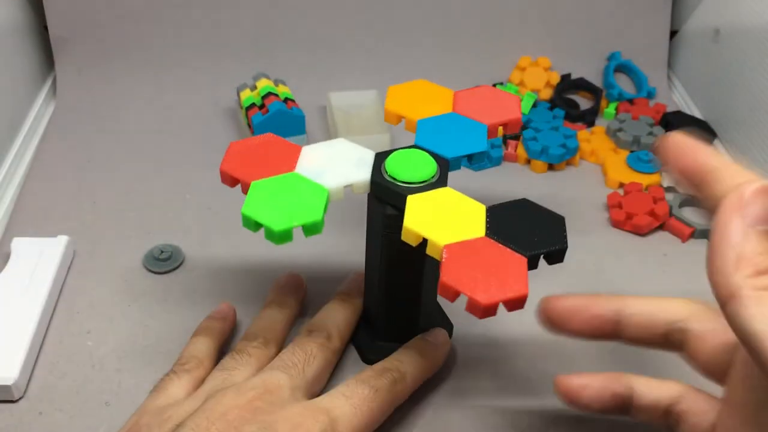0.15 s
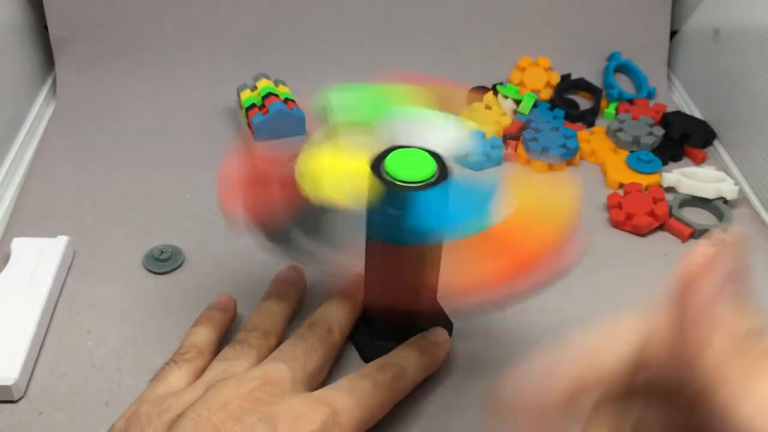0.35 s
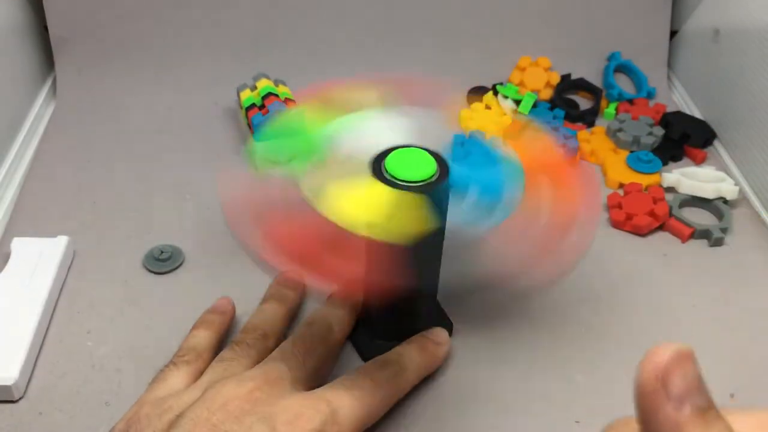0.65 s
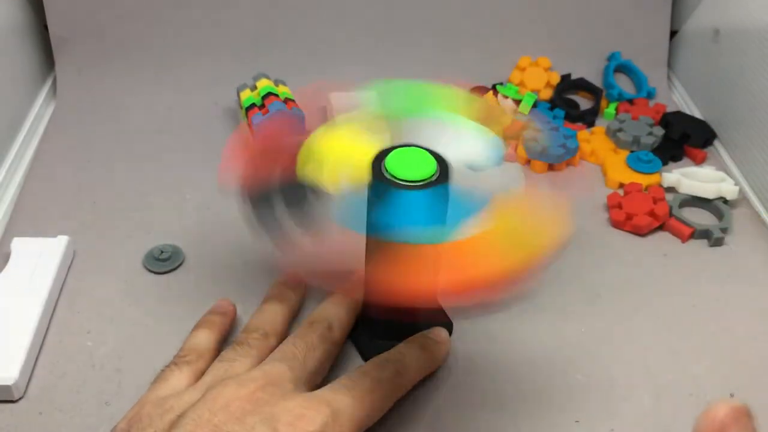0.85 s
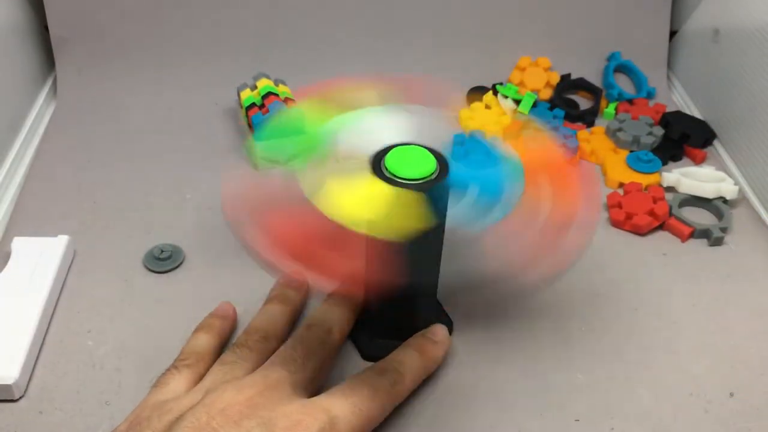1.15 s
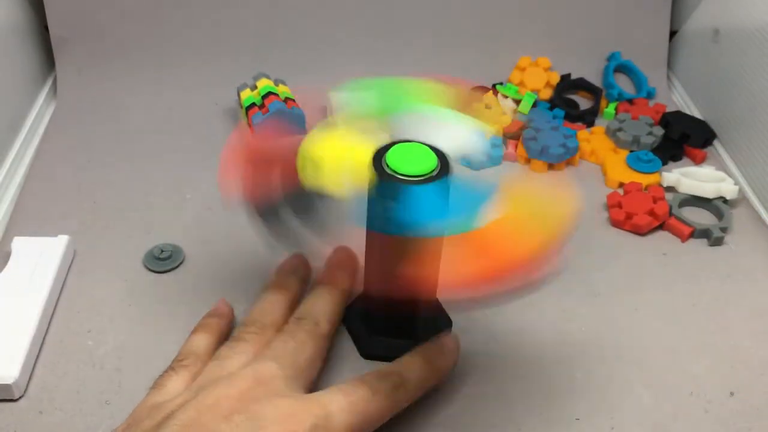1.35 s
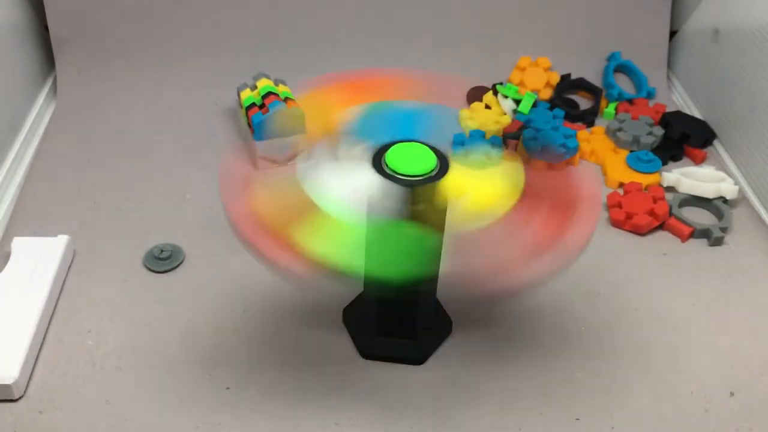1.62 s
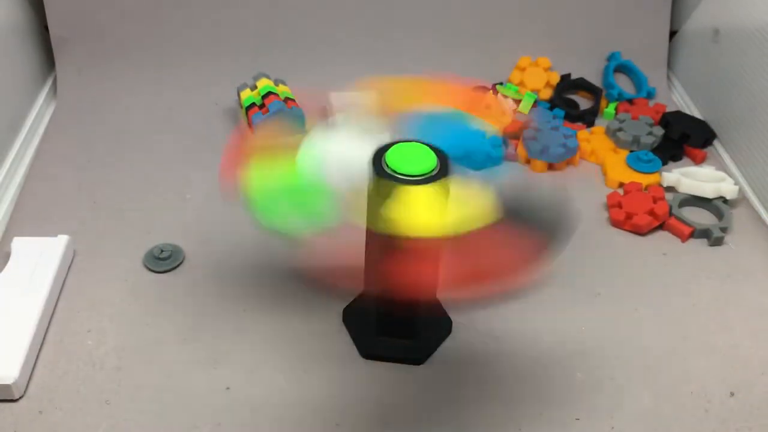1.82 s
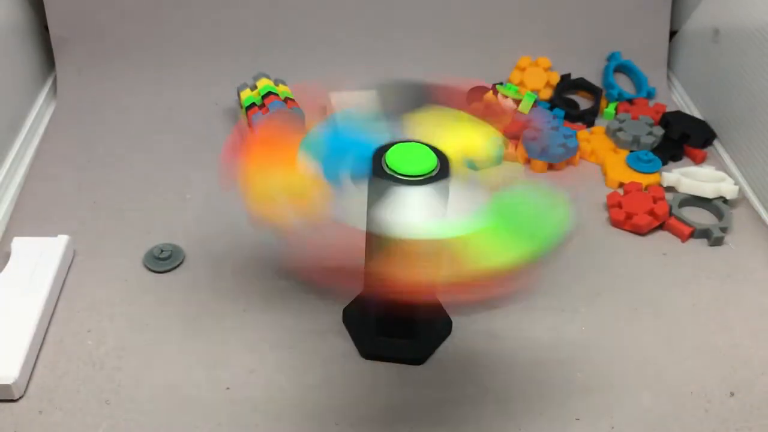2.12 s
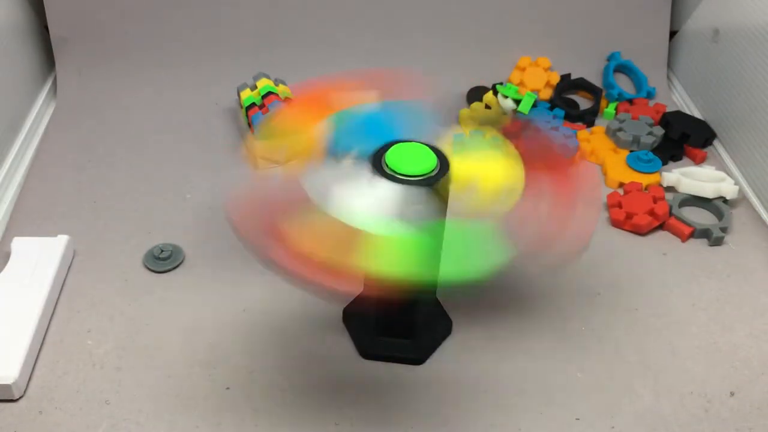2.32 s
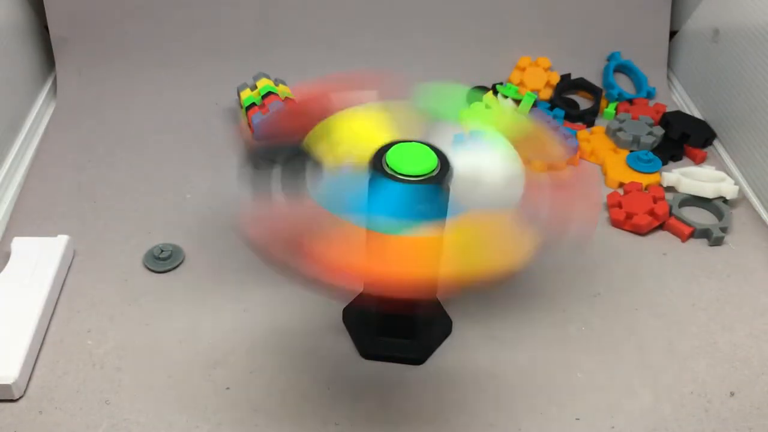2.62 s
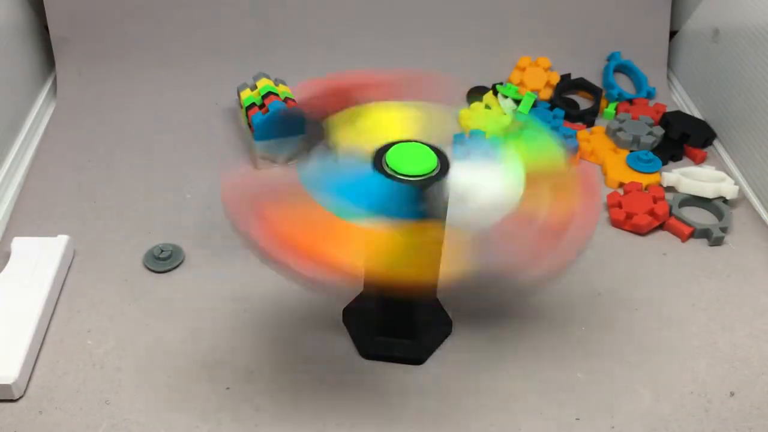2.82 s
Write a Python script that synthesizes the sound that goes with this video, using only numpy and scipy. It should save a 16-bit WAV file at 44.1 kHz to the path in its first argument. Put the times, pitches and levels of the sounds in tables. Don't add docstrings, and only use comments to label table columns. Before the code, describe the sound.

Whirring ball bearing of a flicked toy spinner, dull while hand-held, then brighter and freer

```python
import sys
import numpy as np
from scipy import signal
from scipy.fft import rfft, irfft
from scipy.io import wavfile
from scipy.ndimage import uniform_filter1d

SR = 44100
rng = np.random.default_rng(int(sys.argv[2]) if len(sys.argv) > 2 else 0)


def to_wav(sig):
    pcm = np.clip(np.atleast_2d(sig), -1, 1) * 32767
    pcm = np.round(pcm).astype(np.int16)
    wavfile.write(sys.argv[1], SR, pcm.T)


def rack_gain(trim_db):
    fader = np.asarray(trim_db, float)
    return 10 ** (fader / 20)


N = 130536
T = np.arange(N) / SR


def unit_rms(x):
    return x / np.sqrt(np.mean(x ** 2))


def curve(rows, column=1):
    rows = np.array(rows)
    return np.interp(T, rows[:, 0], rows[:, column])


def bell(centre_s, width_s):
    return np.exp(-0.5 * ((T - centre_s) / width_s) ** 2)


def resonance(x, hz, width_hz):
    b, a = signal.iirpeak(hz, hz / width_hz, fs=SR)
    return signal.lfilter(b, a, x)


def coloured_noise(points):
    points = np.array(points)
    hz = np.maximum(np.arange(N // 2 + 1) * SR / N, 1)
    gain = rack_gain(np.interp(np.log(hz), np.log(points[:, 0]), points[:, 1]))
    return unit_rms(irfft(rfft(rng.standard_normal(N)) * gain, N))


def walk(rate_hz):
    k = int(SR / rate_hz)
    steps = np.repeat(rng.standard_normal(N // k + 1), k)
    return unit_rms(uniform_filter1d(uniform_filter1d(steps, k), k)[:N])


# f/Hz, density/dB per Hz
ROOM_AIR = [(15, -39), (25, -17), (52, -3), (71, -10.5), (152, -12), (193, -14), (359, -14.5), (399, -23.5),
            (15500, -44.5)]
# t/s, level/dB
RUMBLE = [
    (0, -56.5),
    (.3, -74),
    (.7, -79),
    (1.55, -90),
    (1.85, -68),
    (2.2, -66.5),
    (2.45, -82),
    (2.96, -80),
]


def room():
    rumble_hz = 38.7
    rumble = resonance(rng.standard_normal(N), rumble_hz, 29.0)
    rumble = unit_rms(resonance(rumble, rumble_hz, 37.0))
    air = rack_gain(-69 + 0.6 * walk(5.3)) * coloured_noise(ROOM_AIR)
    return air + rack_gain(curve(RUMBLE)) * rumble


# f/Hz, level/dB, t60/s
TABLE_MODES = [(38, 4, 0.29), (81, 2, 0.13), (125, 2, 0.12), (155.6, 4, 0.1), (210.4, 2, 0.14),
               (301, 0.5, 0.1), (343, -6, 0.14)]
# t/s, level/dB, favoured f/Hz
THUMPS = [(0.02, -58.5, 203), (0.085, -46.5, 171), (0.322, -52.5, 193), (0.343, -53, 169),
          (0.3865, -31, 216), (0.389, -27.5, 81), (0.411, -35, 81), (0.43, -36, 216), (.44, -29.5, 105),
          (0.452, -37.5, 38), (.455, -38.5, 247), (0.478, -34.5, 125), (0.521, -44, 80), (0.549, -47, 166)]


def table():
    spread_oct, rise_cycles, shake_db = 0.37, 0.86, -17
    out, t = np.zeros(N + SR), T[:SR // 2]
    for s, db, pitch_hz in THUMPS:
        for hz, mode_db, t60 in TABLE_MODES:
            near = np.exp(-0.5 * (np.log2(hz / pitch_hz) / spread_oct) ** 2)
            rise = 1 - np.exp(-t * hz / rise_cycles)
            decay = rack_gain(db + mode_db - 60 * t / t60)
            out[int(s * SR):][:len(t)] += near * rise * decay * np.sin(2 * np.pi * hz * t)
    shake = sum(resonance(rng.standard_normal(N), hz, 24.0) for hz, _, _ in TABLE_MODES[1:])
    held = 1 - np.clip(curve(SPIN, 2), 0, 1)
    return out[:N] + rack_gain(curve(SPIN) + shake_db) * held * unit_rms(shake)


# t/s, level/dB, f/Hz, t60/s
TAPS = [
    (0.0794, -44.5, 990, 0.013),
    (.0855, -65, 700, 0.039),
    (0.091, -73, 1090, .04),
    (1.35, -40.5, 130, 0.041),
    (1.372, -42, 110, 0.057),
    (1.594, -55, 150, .06),
]


def taps():
    out = np.zeros(N)
    for s, db, hz, t60 in TAPS:
        t = np.maximum(T - s, 0)
        out += rack_gain(db - 60 * t / t60) * (1 - np.exp(-t * hz)) * np.sin(2 * np.pi * hz * t)
    return out


# t/s, level/dB, centre f/Hz, t60/s
TICKS = [(0.084, -59.5, 830, 0.07), (0.15, -75, 8000, 0.033), (0.323, -58, 1800, 0.068),
         (0.3228, -58.5, 3180, 0.025), (.387, -47, 5000, 0.025), (0.386, -45.5, 800, 0.025),
         (0.324, -69, 8700, 0.046), (1.41, -74, 9000, 0.19), (1.535, -76, 9000, 0.15),
         (1.68, -63, 7500, 0.12), (2.005, -60, 8000, .025), (2.004, -50.5, 4460, 0.022),
         (2.235, -59, 8000, 0.16), (1.373, -67, 7400, .06), (1.4156, -64, 7500, .06),
         (1.54, -73, 7500, .09), (2.25, -72, 7500, .09), (2.316, -67, 7500, .06), (2.373, -69, 7500, .06),
         (2.641, -71, 7500, .06)]


def ticks():
    out, hiss = np.zeros(N), rng.standard_normal(N)
    for s, db, hz, t60 in TICKS:
        swell = np.clip((T - s) / (30 * t60 ** 4), 0, 1)
        burst = hiss * rack_gain(db - 60 * np.abs(T - s) / t60) * swell
        edges_hz = [hz / 2.06, min(hz * 1.74, 0.45 * SR)]
        sos = signal.butter(3, edges_hz, "band", fs=SR, output="sos")
        out += signal.sosfilt(sos, burst) * np.sqrt(SR / hz / 2)
    return out


def balls():
    hits_per_s, scatter_db, roll_share = 3500, 2.0, 0.9
    size_db = scatter_db * np.minimum(rng.exponential(size=N), 3)
    hits = (rng.random(N) < hits_per_s / SR) * rng.standard_normal(N) * rack_gain(size_db)
    return unit_rms(hits) + roll_share * rng.standard_normal(N)


def base_grip(hz):
    pressed = np.clip((T - 1.146) / 0.05, 0, 1)
    not_yet_free = np.clip((1.69 - T) / 0.22, 0, 1)
    return (1400 < hz < 2200) * pressed * not_yet_free


def ring(drive, modes, turns, wobble_db):
    turn_hz, flicker_db, damped_db = 5.7, 1.0, -4
    out = 0
    for hz, width_hz, db in modes:
        turning = np.sin(2 * np.pi * (turns * turn_hz * T + rng.random()) + 0.92 * walk(3.3))
        sway_db = wobble_db * min(120 / width_hz, 1) * turning + flicker_db * walk(25.21)
        mode = resonance(drive * rack_gain(sway_db), hz, 1.44 * width_hz)
        mode = resonance(mode, hz, 1.99 * width_hz)
        out = out + rack_gain(db + damped_db * base_grip(hz)) * mode
    return unit_rms(out)


# f/Hz, width/Hz, level/dB
HELD_POST = [(633, 72, -5.5), (708, 102, 1), (811, 29, -2.5), (900, 17, -1.5), (1135, 73, -5),
             (1317, 55, -3), (1525, 106, -2), (1692, 32, -3.5), (1876, 117, -6), (2157, 140, -12),
             (2400, 102, -8), (2926, 280, -14.5), (3437, 450, -18), (4123, 67, -17)]
# f/Hz, width/Hz, level/dB
FREE_POST = [(604, 40, -8.5), (767, 179, -5), (833, 53, -6.5), (913.4, 96, -1), (1140, 149, -1.5),
             (1301, 48, -0.5), (1450, 140, 1.5), (1776, 195, 3), (1931, 115, -3), (2643, 110, 0.5),
             (3094, 170, 1.5), (3293, 227, -1), (4084, 110, -2.5), (4403, 210, -3.5)]
# f/Hz, width/Hz, level/dB
RACES = [(4777, 70, -4.5), (5350, 45, -1), (5790, 116, -2.5), (5710, 270, -10), (6600, 79, 1),
         (6960, 39, -2.5), (7500, 43, -13), (8120, 170, -19.5), (8440, 66, -10), (8600, 130, -18),
         (9100, 740, -13.5), (10730, 145, -6), (11160, 350, -6.5), (12900, 490, -15.5)]
# f/Hz, density/dB per Hz
ARM_AIR = [(4000, -37), (6500, 8.5), (12000, -4), (15500, -3.5)]
# t/s, rolling level/dB, share free of the hand/0-1
SPIN = [(.384, -94, 0.84), (.39, -51, 0), (.46, -58.5, 0.22), (.5, -50, 0.1), (.66, -50.5, 0.02),
        (.76, -48, 0.03), (.93, -51.5, 0.08), (1.06, -50, 0.03), (1.15, -55, 0.16), (1.21, -50, 0.11),
        (1.27, -53.5, 0.13), (1.33, -57.5, 0.43), (1.385, -52.5, 1), (1.55, -52, 1), (2.2, -52, 1),
        (2.96, -52.5, 1)]


def spinner():
    race_wobble_db = 4.5
    drive = balls() * rack_gain(0.8 * walk(60))
    free = np.clip(curve(SPIN, 2), 0, 1)
    post = np.sqrt(1 - free) * ring(drive, HELD_POST, 1, 1.1)
    post += np.sqrt(free) * ring(drive, FREE_POST, 0.97, 0.4)
    post = signal.sosfilt(signal.butter(8, 572, "high", fs=SR, output="sos"), post)
    post += rack_gain(-25) * (1 - free) * ring(drive, [(5790, 70, 0)], 0.74, race_wobble_db)
    steel = rack_gain(-6) * coloured_noise(ARM_AIR) + ring(drive, RACES, 1.7, race_wobble_db)
    started = np.clip((T - SPIN[0][0]) / 0.005, 0, 1)
    return rack_gain(curve(SPIN)) * post + rack_gain(-67.5) * started * steel


# t/s, scrape level/dB
FLICK = [
    (.385, -60),
    (.389, -44.5),
    (.398, -57),
    (.415, -54.5),
    (.435, -49.5),
    (.455, -48),
    (.475, -58),
    (.52, -64.5),
    (.6, -76),
]
# f/Hz, density/dB per Hz
SCRAPE = [(480, -25), (600, -10), (1000, -8.5), (2000, -22), (4000, -18), (6500, -32), (8500, -29),
          (15500, -25.5)]


def flick():
    grit = rack_gain(1.8 * walk(400) + 1.5 * walk(90))
    steel = ring(balls(), RACES, 2, 1.5)
    slide = rack_gain(-63.5) * bell(1.4, 0.055) * steel
    slide += rack_gain(-60.5) * bell(1.42, 0.056) * ring(balls(), [(947, 50, 0)], 1, 0)
    scrape = grit * (coloured_noise(SCRAPE) + rack_gain(-2.5) * steel)
    return slide + (T > FLICK[0][0]) * rack_gain(curve(FLICK)) * scrape


def scene():
    echo_t60_s, echo_db = 0.33, -14.5
    near = spinner() + flick() + ticks() + taps()
    t = T[:SR // 3]
    tail = rng.standard_normal(len(t)) * rack_gain(-60 * t / echo_t60_s) * (t > 0.004)
    echo = signal.fftconvolve(near, tail / np.sqrt(np.sum(tail ** 2)))[:N]
    return (near + rack_gain(echo_db) * echo + table() + room())[None]


def band_limit(x):
    return signal.sosfilt(signal.butter(12, 16260, fs=SR, output="sos"), x)


def record(dry):
    top_hz, shut_share = 15050, 0.9
    x = signal.sosfilt(signal.butter(2, 32.0, "high", fs=SR, output="sos"), dry)
    hz = np.arange(N // 2 + 1) * SR / N
    top = irfft(rfft(x) * (hz > top_hz), N)
    loud_db = 10 * np.log10(uniform_filter1d(top ** 2, size=1024) + 1e-18)
    is_loud = 1.0 * (loud_db > np.quantile(loud_db, shut_share))
    opened = uniform_filter1d(is_loud, size=512)
    roll_off = np.clip((top_hz + 800 - hz) / 200, 0, 1) * (hz > top_hz)
    kept = irfft(rfft(top * opened) * roll_off, N)
    return band_limit(x - top + kept)


dry = scene()
out = record(dry)
to_wav(out)
```